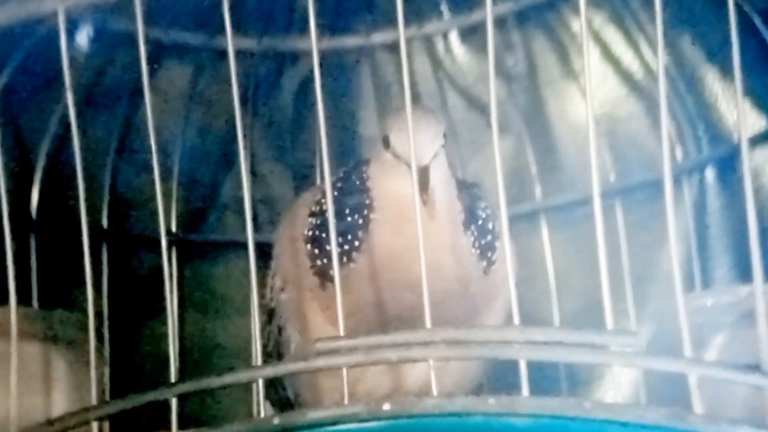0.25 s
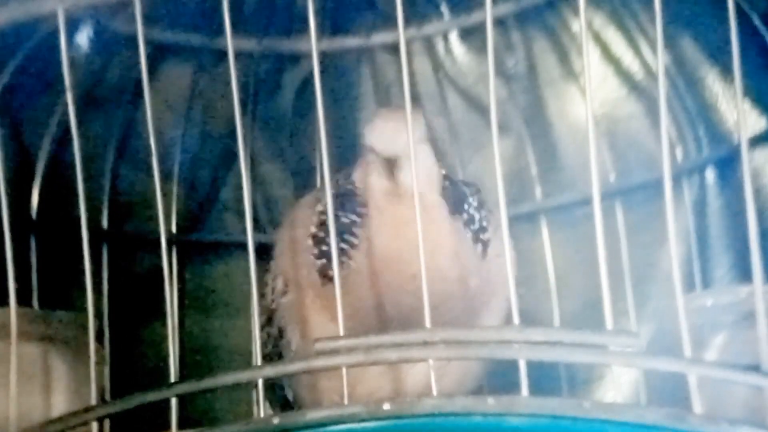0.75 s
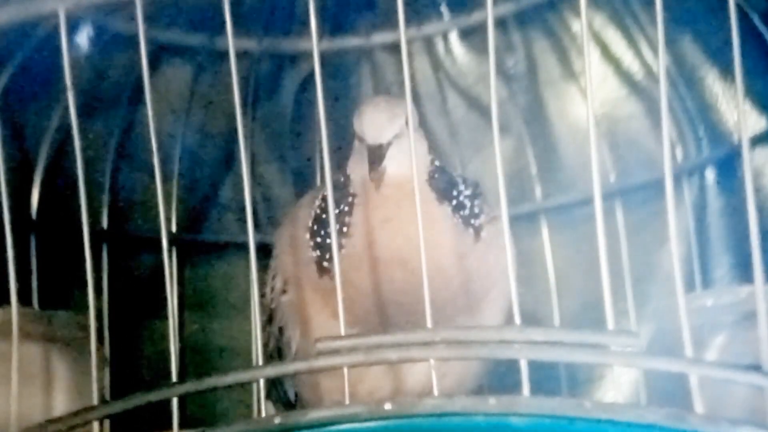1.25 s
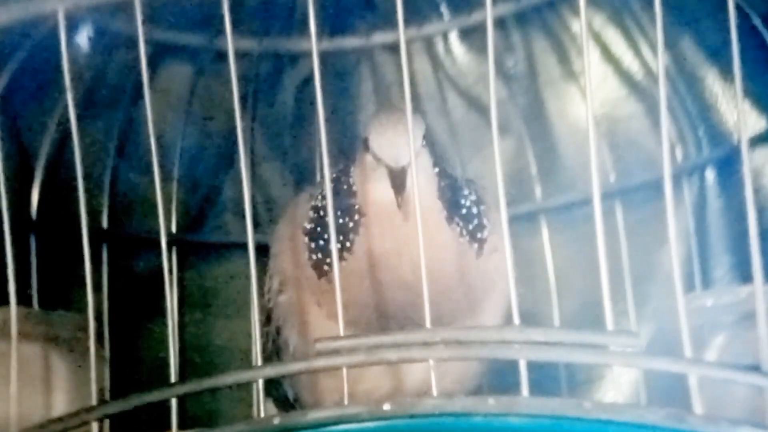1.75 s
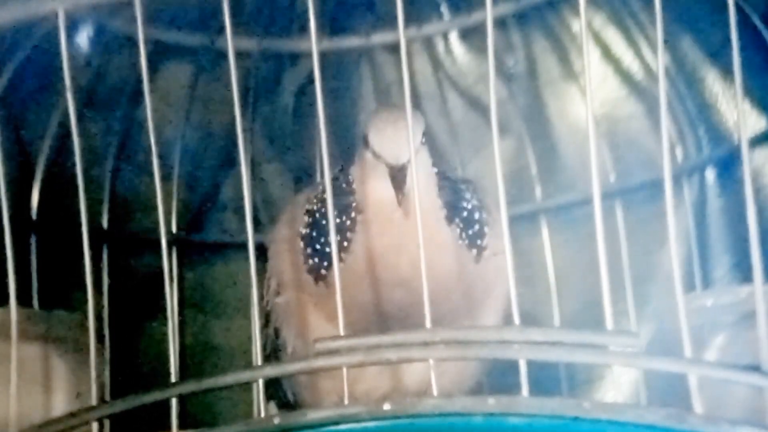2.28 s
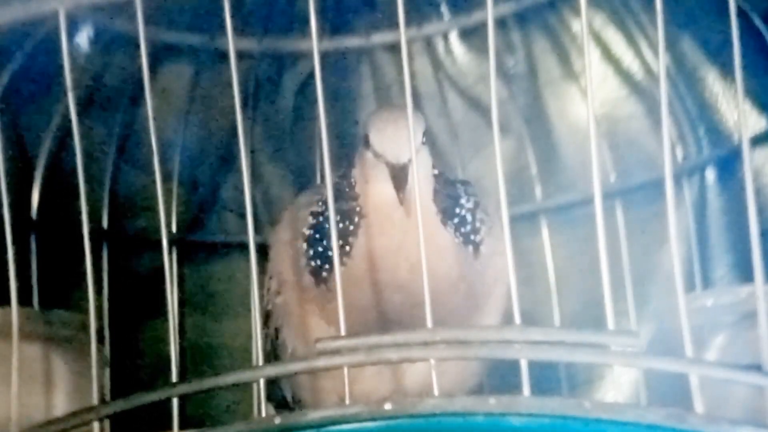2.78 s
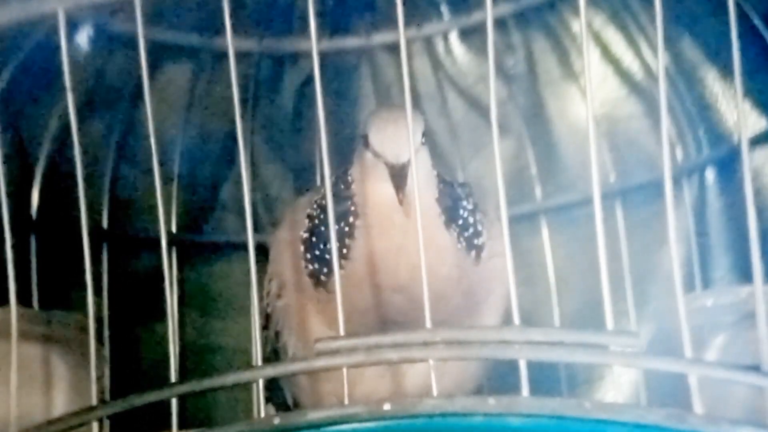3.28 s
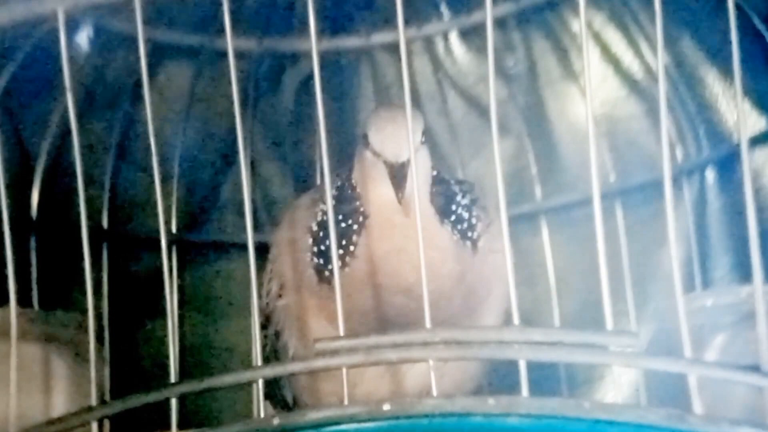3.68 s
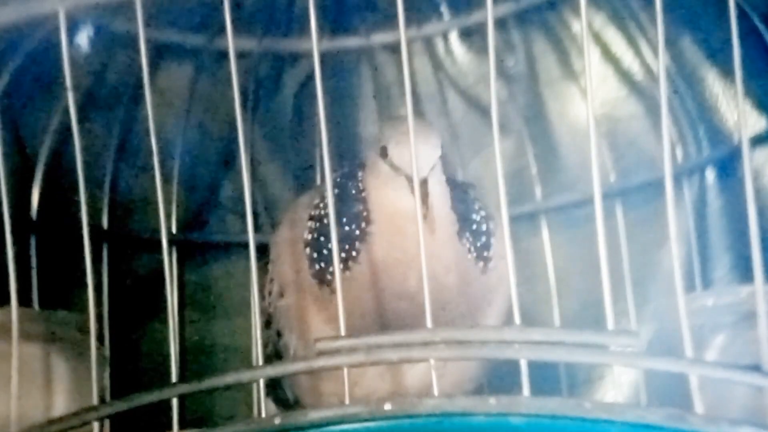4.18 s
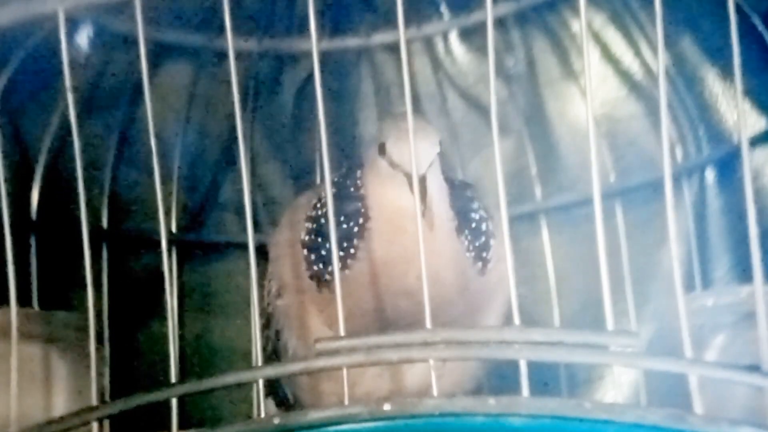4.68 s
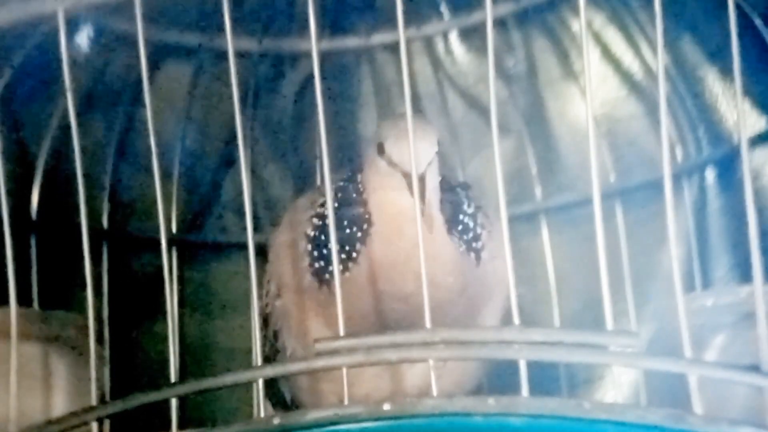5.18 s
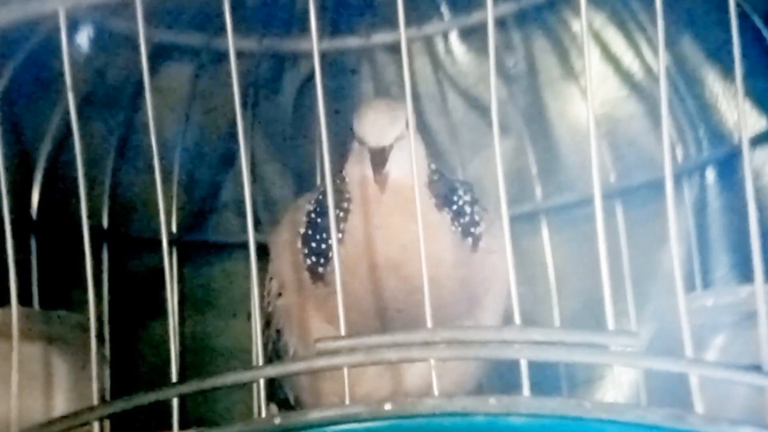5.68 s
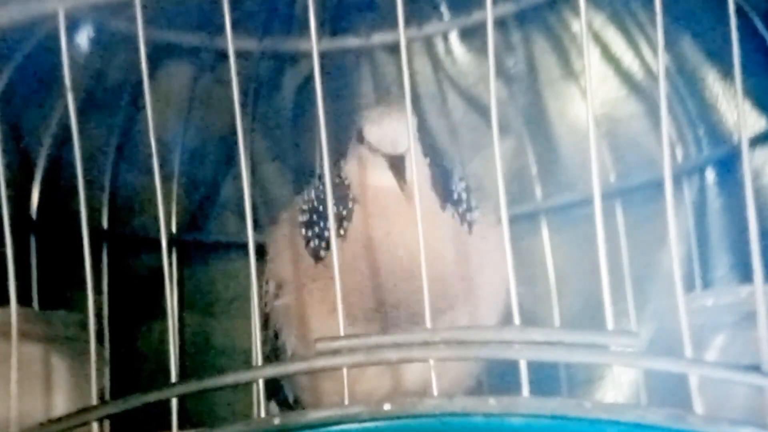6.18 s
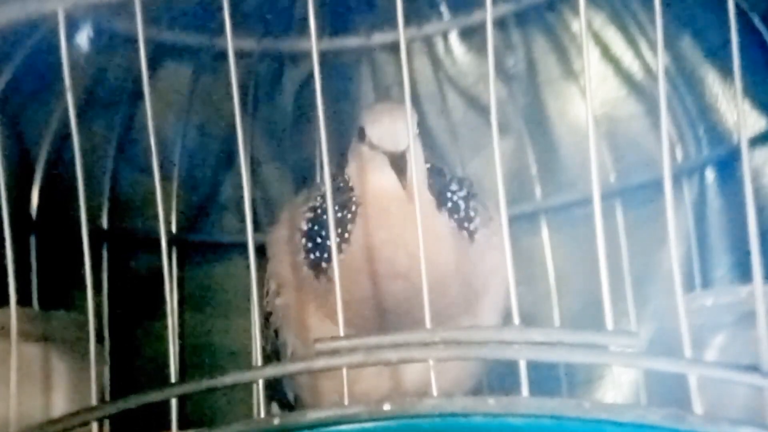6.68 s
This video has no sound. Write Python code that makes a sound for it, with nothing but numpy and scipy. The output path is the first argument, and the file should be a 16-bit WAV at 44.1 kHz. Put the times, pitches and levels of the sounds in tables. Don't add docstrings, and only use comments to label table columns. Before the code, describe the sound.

Very close, a dove coos in low, hollow, slightly rattling tones: the end of one rolling note, then phrases of a short note, a rising note and a longer rolling one. Behind it, a quiet outdoor hum, small bird chirps about every second, a hen's cluck, a distant bang, cocks crowing far off and a thin insect whistle late. Cloth brushes softly near the microphone.

```python
import sys
import numpy as np
from scipy import signal
from scipy.fft import rfft, irfft
from scipy.io import wavfile
from scipy.ndimage import uniform_filter1d, minimum_filter1d, map_coordinates

SR = 44100
rng = np.random.default_rng(int(sys.argv[2]) if len(sys.argv) > 2 else 0)


def wav_record(signal):
    frames = np.transpose(np.atleast_2d(signal))
    bounded = np.clip(frames, -1, 1)
    quanta = np.round(bounded * 32767).astype(np.int16)
    wavfile.write(sys.argv[1], SR, quanta)


def volts(x):
    e = np.asarray(x, float) / 20
    return 10 ** e


N = 306054


def evened(x):
    return x / np.sqrt(np.mean(x ** 2) + 1e-20)


def read(points, hz):
    f, value = np.transpose(points)
    return np.interp(np.log(hz + 1), np.log(f + 1), value)


def curves(rows, t):
    s, *columns = np.transpose(rows)
    return [np.interp(t, s, c) for c in columns]


def add(mix, s, sound):
    part = mix[max(round(s * SR), 0):][:len(sound)]
    part += sound[:len(part)]


def wander(n, hz):
    knots = rng.standard_normal(int(N / SR * hz) + 4)
    return map_coordinates(knots, [np.arange(n) * hz / SR], order=3)


def bumps(rows, rest_db, rise=1.):
    t = np.arange(N) / SR
    power = volts(2 * rest_db)
    for s, width, db in rows:
        side = width * np.where(t < s, rise, 1)
        power = power + volts(2 * db) * np.exp(-((t - s) / side) ** 2)
    return np.sqrt(power)


def resonate(x, hz, width):
    pole = np.exp((2j * np.pi * hz - np.pi * width) / SR)
    return 2 * signal.lfilter([1 - abs(pole)], [1, -pole], x).real


def band(air, hz, width):
    return evened(resonate(resonate(air, hz, width), hz, width))


def noise(table, same=0., lean_db=0., patchy_db=1.0, size=1024):
    hz = np.fft.rfftfreq(size, 1 / SR)
    a, b, c, d, patches = rng.standard_normal((N * 4 // size + 5, len(hz), 5), dtype=np.float32).T
    patches = evened(uniform_filter1d(uniform_filter1d(patches, size=12, axis=0), size=12, axis=1))
    same = np.clip(same * np.ones(len(hz)), -1, 1)[:, None]
    left = a + 1j * b
    z = np.array([left, same * left + np.sqrt(1 - same ** 2) * (c + 1j * d)])
    edge_db = -80 * ((hz < table[0][0]) | (hz > table[-1][0]))
    z *= volts((read(table, hz) + edge_db)[:, None] + patchy_db * patches)
    z *= volts(np.multiply.outer([.5, -.5], lean_db * np.ones(len(hz))))[:, :, None]
    return evened(signal.istft(z, nperseg=size, noverlap=size * 3 // 4)[1][:, :N])


def tail(decays, gap=0.04, rise=0.01):
    hz, t, z = signal.stft(rng.standard_normal((2, SR)), SR, nperseg=256)
    h = signal.istft(z * volts(-60 * t / read(decays, hz)[:, None]), SR, nperseg=256)[1]
    h = h * np.clip((np.arange(h.shape[1]) / SR - gap) / rise, 0, 1)
    return h / np.linalg.norm(h[0])


def through(x, h):
    return signal.fftconvolve(x[None], h, axes=1)[:, :N]


# band_hz, t60_s
YARD = [(150, 0.94), (700, 0.64), (2000, 0.34), (2700, 0.28), (4200, 0.29), (9000, 0.34)]


def far(x, dry_db, wet_db, lean_db, decays=YARD):
    echo = through(x, tail(decays, .005, .012))
    return volts([[lean_db / 2], [-lean_db / 2]]) * (volts(dry_db) * x + volts(wet_db) * echo)


def note(rows, blur_hz, partials=((1, 0),), haze=.2, haze_hz=120):
    t = np.arange(max(rows[0][0], 0), rows[-1][0], 1 / SR)
    db, hz = curves(rows, t)
    phase = 2 * np.pi * np.cumsum(hz + blur_hz * wander(len(t), 150)) / SR
    scatter = wander(len(t), haze_hz) + 1j * wander(len(t), haze_hz)
    smear = (1 + haze * scatter) / np.sqrt(1 + 2 * haze ** 2)
    tone = sum(volts(gain_db) * (smear * np.exp(1j * k * phase)).imag for k, gain_db in partials)
    level = np.sqrt(2) * volts(db + 3.1 * wander(len(t), 60))
    return t[0], level * tone * signal.windows.tukey(len(t), .15)


def whistle(start, length, db, first_hz, last_hz, attack=.03, fade_db=-8.):
    rise = min(attack, length / 2)
    end_db = db + fade_db * length
    return [(start, db - 8.0, first_hz), (start + rise, db, first_hz),
            (start + length - rise / 2, end_db, last_hz), (start + length, end_db - 11.0, last_hz)]


# band_hz, level_db_per_hz
FLOOR = [(15, -54.5), (30, -34), (60, -13), (120, -4), (241, -9.5), (299, -5), (352, -15.5), (402, -2.5),
         (572, -18), (654, -7.5), (857, -24.5), (1180, -32.5), (1980, -36), (3780, -45), (13400, -42),
         (15800, -47)]
# band_hz, likeness (-1 to 1)
FLOOR_LIKENESS = [(60, 0.74), (180, 0.93), (550, 0.78), (1650, -0.69), (4970, 0.21), (15000, -0.94)]
# band_hz, level_db
FLOOR_LEAN = [(60, -0.5), (150, -1.5), (380, 3), (950, 13), (2380, 1.5), (5980, -2.5), (15000, -7.5)]
# pitch_hz, level_db
DRONES = [(436, -69.5), (485, -68), (533, -59.5), (632, -67)]
# centre_s, half_width_s, level_db
GUSTS = [
    (0, 0.31, 10),
    (2.2, 0.6, 5),
    (3.15, 0.29, 1.5),
    (4.1, 0.55, 4.5),
    (4.8, 0.18, 6.5),
    (6.9, 0.42, 10),
]


def hum():
    hz = np.fft.rfftfreq(4096, 1 / SR)
    floor = noise(FLOOR, read(FLOOR_LIKENESS, hz), read(FLOOR_LEAN, hz), 2.2, size=4096)
    air = rng.standard_normal(N)
    drones = sum(volts(db) * band(air, f, 7.7) for f, db in DRONES)
    return volts(-48.15) * bumps(GUSTS, 0) * floor + volts([[2], [-2]]) * drones


# pitch_hz, level_db
BUZZ = [(300, -67.5), (400, -65), (500, -72), (650, -59), (750, -69.5), (900, -70), (1000, -85),
        (1300, -88)]


def buzz():
    mains_hz = 49.85
    order, bins = np.arange(6, 26), np.zeros(N // 2 + 1, complex)
    level_db = read(BUZZ, mains_hz * order) + 0.86 * (-1.) ** (order + 1)
    phase = 2 * np.pi * rng.random(len(order))
    bins[np.round(mains_hz * order * N / SR).astype(int)] = volts(level_db) * np.exp(1j * phase)
    steady = irfft(bins, N) * N / np.sqrt(2)
    return volts([[1.5], [-1.5]]) * volts(2.3 * wander(N, 0.98)) * steady


# pitch_hz, width_hz, level_db
MOTOR = [(100.5, 26, -52.5), (140, 10, -58.5)]


def motor():
    bands = sum(volts(db) * band(rng.standard_normal(N), hz, width) for hz, width, db in MOTOR)
    return volts(-3.0) * bumps(GUSTS, 0) * bands


# band_hz, t60_s
TREES = [(2600, .26), (3300, .34), (4200, .34), (5200, .3), (6500, .18)]
# offset_s, level_db, pitch_hz
CHIRP = [
    (-.015, -18, 4420),
    (.025, -9, 4390),
    (.055, -6, 4170),
    (.08, -4, 3780),
    (.088, -11, 3450),
    (.096, 0, 3130),
    (.106, 2, 2760),
    (.122, -1, 2740),
    (.136, 0.3, 3020),
    (.15, -12, 2750),
]
# start_s, level_db, opening_lift_hz
CHIRPS = [
    (0.423, -53.5, 190),
    (1.62, -52, 5.5),
    (2.575, -54, 16),
    (3.507, -52.5, 6.8),
    (4.535, -51, 13),
]
# start_s, level_db, pitch_hz
RATTLE = [
    (.4, -72, 2150),
    (.47, -71, 2080),
    (.6, -73, 2150),
    (.68, -72, 2220),
]
# start_s, length_s, level_db, first_pitch_hz, last_pitch_hz
INSECT = [
    (4.979, 0.34, -60.5, 6468, 6220),
    (5.393, 0.22, -65, 6360, 6130),
    (5.617, 0.18, -62.5, 6280, 6200),
    (5.883, 0.057, -58, 6275, 6210),
    (5.979, 0.49, -60.5, 6300, 5960),
    (6.273, 0.31, -61.5, 5960, 6210),
    (6.591, 0.486, -57, 5950, 5960),
]


def high_calls():
    calls = np.zeros(N)
    for start, level_db, lift_hz in CHIRPS:
        rows = [(start + s, level_db + db, hz + lift_hz * (hz > 3500)) for s, db, hz in CHIRP]
        add(calls, *note(rows, 55, haze=.9, haze_hz=330))
    add(calls, *note(RATTLE, 130, haze=3, haze_hz=158))
    for call in INSECT:
        add(calls, *note(whistle(*call, 0.051, -32.0), 50, haze=1.2, haze_hz=220))
    return far(calls, -2.6, -3.7, -1.5, TREES)


# start_s, length_s, level_db, first_pitch_hz, last_pitch_hz
CROWS = [
    (2.229, 0.22, -50.5, 1446, 1467),
    (2.521, 0.22, -51, 1620, 1628),
    (3.618, 0.29, -51, 1439, 1390),
    (3.28, 0.33, -49, 1456, 1419),
    (3.608, 0.18, -45.5, 1652, 1662),
    (3.84, 0.5, -45, 1650, 1630),
]
# start_s, length_s, level_db, first_pitch_hz, last_pitch_hz
STRAYS = [
    (3.571, 0.1, -39.5, 600, 533),
    (6.6, 0.14, -46, 739, 720),
    (3.2, .36, -47.5, 770, 500),
    (5.5, 0.19, -54.5, 632, 628),
    (3.92, 0.5, -58, 1500, 1880),
]


def crowing():
    fowl = np.zeros(N)
    partials = ((.5, -3.0), (1, -0.5), (1.5, -23.5))
    for call in CROWS:
        add(fowl, *note(whistle(*call, 0.035, -30.0), 18, partials, haze=0.38, haze_hz=120))
    for call in STRAYS:
        add(fowl, *note(whistle(*call, 0.028, -14.0), 34, haze=0.26, haze_hz=133))
    return far(fowl, -2.5, -5.0, -1.3)


# start_s, level_db, pitch_hz
CLUCK = [
    (1.03, -46, 700),
    (1.042, -39, 688),
    (1.057, -31, 744),
    (1.065, -35, 570),
    (1.075, -41, 710),
    (1.1, -44, 690),
]


def cluck():
    hen = np.zeros(N)
    add(hen, *note(CLUCK, 8, ((.5, -5), (1, .5), (1.5, -18.0)), haze=0.7, haze_hz=121))
    return volts([[1.5], [-1.5]]) * hen


# start_s, level_db
BANG = [
    (2.881, -7),
    (2.907, -18.5),
    (2.93, -21),
    (2.962, -20),
    (3, -27),
    (3.061, -32.5),
    (3.099, -28),
]
# pitch_hz, level_db, t60_s
BOARD = [(479, -9, 0.17), (560, 3, 0.036), (707, 7, 0.029), (1290, -8.5, 0.019)]
# band_hz, level_db_per_hz
BANG_TAIL = [(59, -40), (100, -16.5), (183, -20), (403, -3.5), (600, -4.5), (765, -0.5), (886, -8.5),
             (1620, -12), (1780, -15), (1950, -15.5), (3440, -39.5), (8000, -78.5), (10400, -90),
             (17600, -120)]


def bang():
    t, ring, click = np.arange(6000) / SR, np.zeros(N), np.zeros(N)
    board = sum(volts(db - 60 * t / t60) * np.sin(2 * np.pi * hz * t) for hz, db, t60 in BOARD)
    for s, db in BANG:
        add(ring, s, volts(db) * board * np.minimum(t / .0015, 1))
    blow_s = BANG[0][0]
    add(click, blow_s, np.ones(1))
    hz = np.fft.rfftfreq(N, 1 / SR)
    echo = irfft(rfft(through(click, tail(YARD, 0.0011, 0.026))) * volts(read(BANG_TAIL, hz)), N)
    echo *= np.arange(N) > blow_s * SR
    return volts([[2.2], [-2.2]]) * (ring + volts(16.5) * echo / np.linalg.norm(echo[0]))


# band_hz, level_db_per_hz
FINE = [(1180, -34.5), (2000, 2), (2260, -14.5), (4710, -4.5), (6370, -7), (8690, -8), (15800, -10.5)]
# band_hz, level_db_per_hz
COARSE = [(410, -43.5), (700, -17.5), (728, -4.5), (990, -1), (2450, -17.5), (3030, -21), (7000, -27.5),
          (9100, -55.5), (15400, -120)]
# centre_s, half_width_s, level_db
RUBS = [(0, 0.014, -64.5), (.83, 0.063, -74), (2.485, 0.058, -65), (2.89, 0.12, -69), (3.32, 0.16, -63.5),
        (3.59, 0.13, -69.5), (3.8, .05, -64.5), (3.945, 0.061, -57.5), (4.15, 0.073, -61), (5.8, 0.17, -67),
        (6.12, 0.23, -69.5), (6.4, 0.046, -66), (6.455, 0.065, -56), (6.69, 0.077, -62)]
# centre_s, half_width_s, level_db
SCUFFS = [(0, 0.004, -48), (.31, 0.11, -68), (.92, 0.088, -60), (1.8, 0.13, -71), (2.52, 0.08, -60.5),
          (2.94, 0.079, -61.5), (3.21, 0.061, -64.5), (3.42, 0.085, -60), (3.63, 0.057, -65.5),
          (3.97, 0.095, -61.5), (4.18, 0.083, -58.5), (4.7, 0.23, -62.5), (6.52, 0.045, -66.5)]


def rustle():
    rest_db, scuff_rest_db, coo_hiss_db = -75, -78, -67.5
    coo_swells = [(s + 0.27 * length, 0.42 * length, coo_hiss_db) for s, length, *_ in [*RISINGS, *ROLLINGS]]
    fine = bumps([*RUBS, *coo_swells], rest_db, 0.12)
    sides = (fine / volts(rest_db)) ** (0.64 * np.array([[-.5], [.5]]))
    rub = sides * fine * volts(4.5) * noise(FINE, size=256)
    scuff = bumps(SCUFFS, scuff_rest_db) * volts(9.5) * noise(COARSE, 0.083, -1.8, size=256)
    return rub + scuff


def murmur(db):
    air = rng.standard_normal(5000)
    low, high = (band(air, hz, 100) for hz in (455, 860))
    return volts(db) * (low + 0.36 * high) * signal.windows.tukey(len(air), .5)


def sung(shape, start, length, db, swell_db, hiss_db):
    share, effort_db, hz, depth = np.transpose(shape)
    s = start + share * length
    throat = np.transpose([s, effort_db + db + swell_db * (2 * share - 1), hz, depth])
    hiss_hz = 5960 + 2.7 * (np.where(share < .6, 630, hz) - 600)
    return throat, np.transpose([s, hiss_db + 0.6 * (effort_db + 10.5), hiss_hz])


# multiple, level_db at top pitch, loss_db_per_hz below it
OVERTONES = [(2, -34.5, 0.03), (3, -53, 0.5), (5, -34.5, 0.7)]
# centre_s, length_ms, depth (0-1)
CATCHES = [(0.011, 6.3, 0.83), (0.022, 1.3, 0.7), (0.036, 2.6, 0.85), (0.061, 7.1, 0.94), (0.082, 5, 0.78),
           (0.094, 3.5, 0.75), (0.123, 6.6, 0.34), (0.153, 2.7, 0.61), (0.175, 5.4, 0.38),
           (0.194, 14.2, 0.94), (0.267, 2.25, 0.66), (0.293, 5.9, 0.7), (0.314, 9.1, 0.35), (0.361, 3, 0),
           (1.567, 5.7, 0.98), (1.72, 2.02, 1), (1.743, 2.33, 0.46), (1.758, 3, 0.64), (1.767, 5.1, 0.78),
           (1.782, 4.6, 0.86), (1.805, 9.1, 0.88), (1.832, 6.7, 0.82), (1.891, 8.6, 0.87),
           (1.908, 4.87, 0.87), (2.112, 1.6, 0.7), (2.119, 2, 0.78), (2.135, 8.5, 0.63), (2.153, 4.7, 0.73),
           (2.177, 7, 0.45), (2.189, 1.7, 1), (2.199, 5.8, 0.6), (2.219, 2.0, 0.7), (2.236, 5.3, 0.86),
           (2.253, 1.27, 0.8), (2.269, 4.8, 0.94), (2.288, 1.4, 0.9), (2.299, 3.8, 0.47),
           (2.321, 3.2, 0.56), (2.334, 4.6, 1), (2.367, 3.9, 0.75), (2.387, 4.4, 0.23), (2.493, 4.7, 0.55),
           (2.507, 2.1, 0.75), (2.53, 2.6, 0.48), (2.562, 1.7, 0.43)]
# centre_s, length_ms, depth (0-1)
LATE_CATCHES = [(3.876, 5.2, 0.2), (3.922, 5.3, 0.82), (4.097, 2.1, 0.7), (4.111, 2.9, 1),
                (4.126, 3.6, 0.2), (4.136, 1.6, 0.4), (4.156, 4.6, 0.5), (4.177, 3.6, 0.5),
                (4.206, 3.1, 0.46), (4.243, 8.7, 1), (4.262, 3.5, 0.94), (4.458, 1.7, 0.6),
                (4.481, 4.9, 0.7), (4.502, 8.3, 0.6), (4.529, 4.2, 0.4), (4.539, 2, 0.32),
                (4.552, 5.5, 0.86), (4.565, 3.8, 0.8), (4.578, 1.5, 0.6), (4.589, 2.8, 0.8),
                (4.603, 1.1, 0.6), (4.615, 5.3, 1), (4.634, 3.9, 0.9), (4.649, 2.8, 0.49),
                (4.665, 2.8, 0.8), (4.684, 9.0, 0.52), (4.71, 5.1, 0.42), (4.851, 10, 0.52), (4.906, 8, 0),
                (6.188, 3.2, 0.71), (6.341, 3.1, 0.8), (6.354, 2.4, 0.6), (6.367, 3.1, 0.8),
                (6.379, 2.9, 0.5), (6.396, 3.4, 0.1), (6.437, 2.1, 0.62), (6.458, 7.4, 0.8),
                (6.514, 5.3, 0.8), (6.533, 4.9, 0.8), (6.726, 2.1, 0.8), (6.737, 2.2, 0.47),
                (6.746, 5.2, 0.5), (6.759, 5.3, 0.69), (6.78, 9.9, 0.49), (6.808, 3.6, 0.7),
                (6.827, 3.7, 0.6), (6.846, 3.6, 0.8), (6.865, 2.1, 0.6), (6.882, 5.2, 0.89),
                (6.898, 2.3, 0.9), (6.913, 4.2, 0.8)]
# centre_s, length_ms, depth (0-1)
FALTERS = [
    (0.023, 13, 0.56),
    (.105, 37, 0.48),
    (2.379, 21, 0.48),
    (4.585, 32.6, 0.68),
    (6.925, 25, 0.67),
    (2.19, 55, 0.17),
    (2.293, 9, .45),
    (4.49, 45, 0.21),
    (4.646, 8, 0.33),
    (6.77, 15, 0.31),
]
# centre_s, length_ms, gain (0-1)
SURGES = [(.002, 3, 0.3), (.051, 5, 0.4), (.072, 5.8, .3), (.142, 6, .3), (.183, 6.2, .9), (.213, 5.1, .8),
          (1.899, 5.5, .6), (2.31, 2.8, .5), (2.35, 2.8, .6), (2.416, 4.6, .3), (2.436, 8, .3),
          (4.625, 7.8, .6), (4.675, 8, .4), (4.72, 9, .4)]


def coo(rows):
    t = np.arange(max(rows[0][0], 0), rows[-1][0], 1 / SR)
    n = len(t)
    effort_db, hz, depth = curves(rows, t)
    depth = np.clip(depth, 0, 1)
    hz = hz - 45 * np.exp((t - t[-1]) / .02)

    grip = np.ones(n)
    for s, ms, d in [*CATCHES, *LATE_CATCHES, *FALTERS]:
        if t[0] - .1 < s < t[-1] + .1:
            grip *= 1 - np.clip(d, 0, 1) * np.exp(-((t - s) * 1000 / ms) ** 2)
    grip = grip * (1 + sum(np.clip(g, 0, 2) * np.exp(-((t - s) * 1000 / ms) ** 2) for s, ms, g in SURGES))

    twist = np.zeros(n)
    for s, ms, d in [*CATCHES, *LATE_CATCHES]:
        if t[0] < s < t[-1]:
            u = (t - s) * 1000 / 5
            twist += 150 * depth * d * u * np.exp(-u ** 2)
    slip = np.maximum(1 - grip, 0) ** 2
    sag = 190 * depth * (uniform_filter1d(slip, size=1800) - slip)
    jitter = (2.7 + 9 * depth) * wander(n, 170)
    phase = 2 * np.pi * np.cumsum(uniform_filter1d(hz + twist, size=100) - sag + jitter) / SR

    blur = .5 * wander(n, 140)
    overtones = np.zeros(n)
    for k, db, fall in OVERTONES:
        level_db = db - fall * (645.0 - hz) - 1.2 * k * k * depth
        overtones += volts(level_db) * np.sin(k * phase + blur)
    leak = volts(-42.5 + 16 * depth) * band(rng.standard_normal(n), 850, 240)
    tone = grip * np.sin(phase) + np.sqrt(grip) * overtones + leak
    body = 1 + (.04 + .17 * depth) * wander(n, 130)

    slack_level = depth * volts(-25.5 + 3.5 * wander(n, 60))
    slack = slack_level * np.sin(2 * np.pi * np.cumsum(493 + 28 * wander(n, 75)) / SR)
    slack = slack * np.minimum(volts(effort_db + 24.5), 1)
    edge = np.clip(np.minimum((t - rows[0][0]) / .006, (t[-1] - t) / .014), 0, 1)
    return t[0], np.sqrt(2) * (volts(effort_db - 3.0 + 5.1 * depth) * body * tone + slack) * edge


# share (0-1), effort_db, pitch_hz, flutter (0-1)
SHORT = [
    (0, -36, 440, 0.2),
    (.14, -20, 509, 0.4),
    (.38, -16, 560, 0.1),
    (.66, -14, 570.7, 0.2),
    (.86, -23, 477, .12),
    (1, -23.5, 425, 0.2),
]
# share (0-1), effort_db, pitch_hz, flutter (0-1)
RISING = [
    (0, -34, 452.6, 0.5),
    (.2, -19.5, 498, 0.6),
    (.42, -14.5, 586, 0.5),
    (.62, -14.5, 617.7, 0.2),
    (.72, -14, 633, .05),
    (.86, -9, 630.2, 0.2),
    (.93, -9, 603.9, 0.4),
    (1, -20.5, 520, 0.1),
]
# share (0-1), effort_db, pitch_hz, flutter (0-1)
ROLLING = [
    (0, -27.5, 499.5, .3),
    (.1, -13.5, 628, 0.7),
    (.31, -16, 631.6, 0.67),
    (.37, -12, 601.8, 0.6),
    (.5, -10.5, 600.3, 0.2),
    (.67, -12, 581, 0.1),
    (.78, -13.5, 542.3, 0.22),
    (.92, -17.5, 525, 0.3),
    (.98, -16.5, 483, 0.08),
]
# start_s, length_s, level_db, swell_db towards the end, hiss_db
SHORTS = [
    (1.498, .106, 0.08, 2.4, -86),
    (3.851, .102, 1.5, 0.5, -80),
    (6.118, .107, 1.2, 1, -89.5),
]
# start_s, length_s, level_db, swell_db towards the end, hiss_db
RISINGS = [
    (1.675, 0.25, -.4, .3, -67),
    (4.054, 0.2232, .1, -0.43, -64.5),
    (6.309, 0.24, 0.014, .4, -64.5),
]
# start_s, length_s, level_db, swell_db towards the end, hiss_db
ROLLINGS = [
    (-.118, 0.52, -0.057, 0.156, -62.5),
    (2.083, 0.53, -0.23, 0.81, -64.5),
    (4.432, .526, 0.11, -0.86, -61),
    (6.707, 0.52, 0.21, -0.67, -63.5),
]
# pitch_hz, width_hz, level_db
STANDING = [(472.1, 29, -0.5), (581.5, 14, -1), (631, 16, -1), (699, 54, 4.5)]
# delay_ms, gain
PATHS = [(-7.71, .17), (.91, -.48), (4.76, .22), (16.78, -.15)]
# band_hz, t60_s
SHELTER = [(300, .26), (480, .22), (640, .24), (1500, .25), (6000, .2)]


def dove():
    voice, air = np.zeros(N), np.zeros(N)
    for shape, calls in (SHORT, SHORTS), (RISING, RISINGS), (ROLLING, ROLLINGS):
        for call in calls:
            throat, hiss = sung(shape, *call)
            add(voice, *coo(throat))
            add(air, *note(hiss, 90, ((.88, -6.5), (1, 2.5)), haze=2.5, haze_hz=488))
    for start, length, *_ in SHORTS:
        add(voice, start + 0.8 * length, murmur(-40))
    voice = signal.sosfiltfilt(signal.butter(3, 400, 'high', fs=SR, output='sos'), voice)

    paths, ahead = np.zeros((2, 2048)), 400
    paths[:, ahead] = 1
    for ms, gain in PATHS:
        paths[:, ahead + round(ms * SR / 1000)] = gain, -gain
    rung = voice + sum(volts(db) * resonate(voice, hz, width) for hz, width, db in STANDING)
    near = signal.fftconvolve(rung[None], paths, axes=1)[:, ahead:ahead + N]
    echo = volts([[-20], [-22.5]]) * through(voice, tail(SHELTER))
    return near + echo + volts(-1.5) * air


def scene():
    background = hum() + buzz() + motor()
    neighbours = high_calls() + crowing() + cluck() + bang()
    return background + neighbours + rustle() + dove()


def low_pass(x):
    return signal.sosfilt(signal.butter(12, 15790, fs=SR, output="sos"), x)


def record(dry):
    room = np.minimum(.97 / np.maximum(abs(dry).max(0), 1e-6), 1)
    gain = uniform_filter1d(minimum_filter1d(room, size=301), size=151)
    return low_pass(dry * gain)


dry = scene()
out = record(dry)
wav_record(out)
```